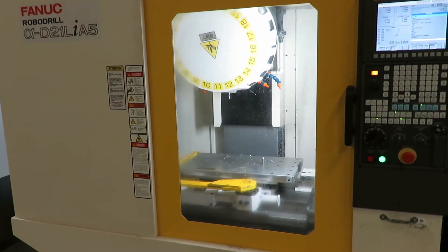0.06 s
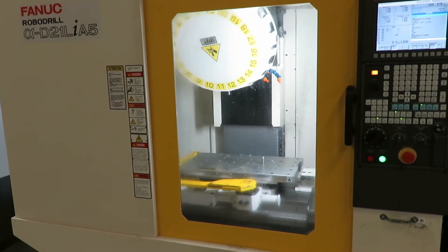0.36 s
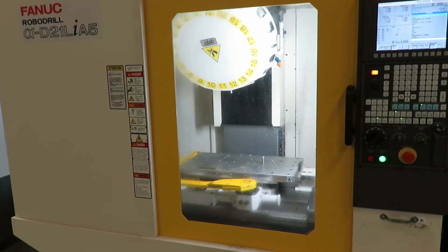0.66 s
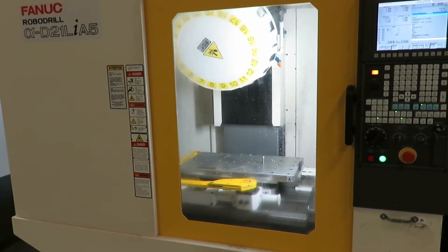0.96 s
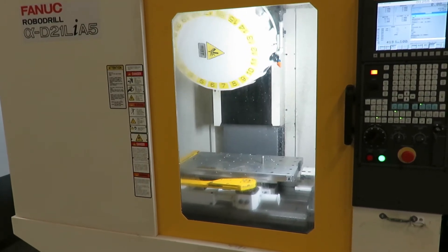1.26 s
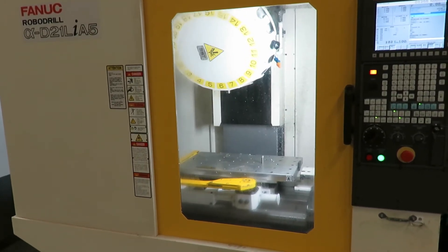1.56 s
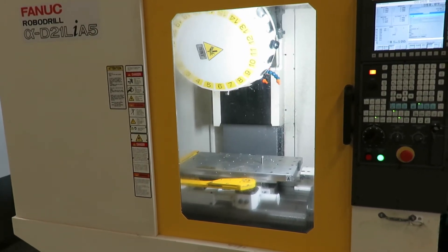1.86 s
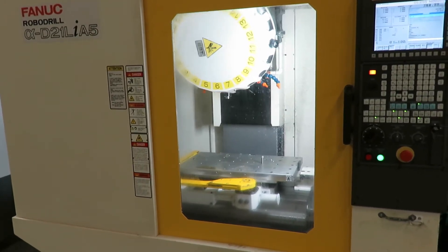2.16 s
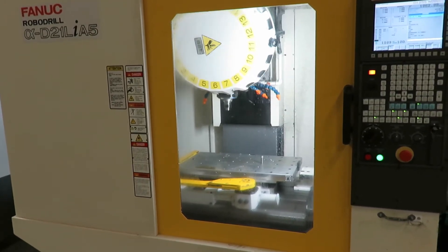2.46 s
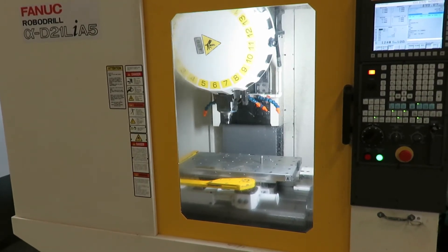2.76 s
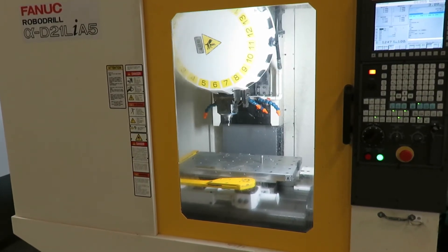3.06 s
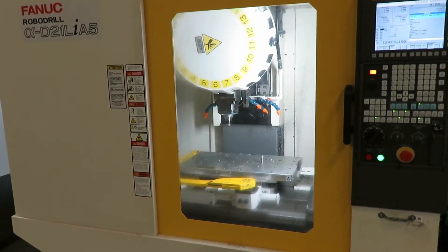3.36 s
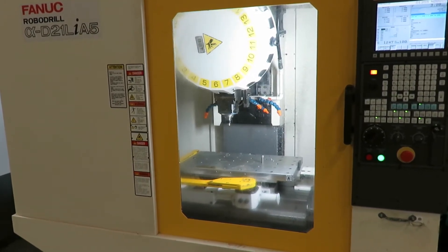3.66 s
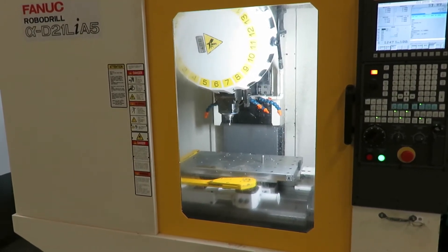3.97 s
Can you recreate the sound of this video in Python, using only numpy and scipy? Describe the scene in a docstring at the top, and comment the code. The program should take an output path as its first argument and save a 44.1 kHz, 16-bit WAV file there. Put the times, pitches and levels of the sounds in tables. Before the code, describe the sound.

A machining center changing tools, with two hissing air blasts, clunks and a whirring turret.

```python
"""A machining centre changing tools, heard from in front of its closed door on a closely spaced microphone pair.
Air blasts through the spindle taper as the tool is released with a clunk, and the geared turret whirs
round. A second blast blows while the next tool is taken up, then the spindle head travels down.
Fans and a small air leak run throughout; the recorder's gain control ducks them and lets them swell back."""
import sys
import numpy as np
from scipy import signal
from scipy.fft import rfft, irfft
from scipy.io import wavfile
from scipy.ndimage import uniform_filter1d

SR = 44100
rng = np.random.default_rng(int(sys.argv[2]) if len(sys.argv) > 2 else 0)


def transcribe(u):
    """Save the signal u as a 16-bit wav file named by the first command-line argument.

    u: samples, shape (n,) or (channels, n), limited to [-1, 1]; the rate is SR.
    q: integer samples, one column per channel.
    """
    v = np.clip(np.atleast_2d(u).T, -1, 1)
    q = np.round(v * 32767).astype(np.int16)
    wavfile.write(sys.argv[1], SR, q)


N = 176400
TIME = np.arange(N) / SR
FREQS = np.maximum(np.arange(N // 2 + 1) * SR / N, 1)

# two air blasts, a table each: time_s, hoot_db, rush_db, hiss_db, hoot_pitch_hz, taper_opening (0-1)
AIR_BLASTS = [
    [(0, -14.5, -16.5, -5.5, 1265, 0.05), (.1, -21.5, -11, -2, 1265, .05), (.33, -20.5, -15, -6.5, 1265, 0),
     (.41, -18, -16.5, -9, 1265, 0.01), (.48, -16.5, -14, -5, 1255, .05), (.58, -12.5, -13, -11, 1270, 0.2),
     (.69, -17.5, -17.5, -13, 1328, .45), (.8, -30.5, -23.5, -31.5, 1290, .5),
     (1.0, -50, -37.5, -50, 1300, 0.4), (1.2, -69, -44, -75, 1300, .5)],
    [(1.662, -50, -60, -68, 1260, .3), (1.664, -19.5, -34.5, -54, 1260, 0.32),
     (1.692, -9.5, -19.5, -23, 1270, .3), (1.71, -12, -19.5, -18, 1270, 0.37),
     (1.735, -6.5, -9.5, -4.5, 1290, .6), (1.81, -12.5, -14.5, -4, 1210, 0.8),
     (1.89, -22.5, -21.5, -10, 1110, .95), (2.06, -20.5, -25, -7, 1080, 0.99),
     (2.17, -26.5, -27, -12.5, 1050, .92), (2.28, -34, -32, -25, 1030, .7), (2.7, -59, -59, -67, 1000, .3)],
]
# upper resonances of the taper: shut_hz, open_hz, width_hz, shut_level_db, open_level_db
TAPER_RESONANCES = [(2761, 3040, 450, -2, -0.26), (4545, 4940, 570, -5, 1.7), (6250, 6860, 620, -8.5, .5),
                    (8400, 8850, 700, -12, -.5)]
# colours of the jet's rush and of its treble hiss: frequency_hz, relative_density_db
RUSH_SPECTRUM = [(30, -50), (100, -11), (500, -21), (850, -14.5), (1150, -8), (1550, -2), (1900, -2),
                 (2300, -1), (3500, 0), (5200, -5.5), (9000, -10.5), (16000, -35)]
HISS_SPECTRUM = [(1500, -32), (3500, -10.5), (5500, -7), (7500, -5.5), (9500, -3), (10800, -2.5),
                 (12600, 2), (13800, -3.5), (14600, -2), (16000, -32.5)]
# colours of the fans and pumps and of the air leak: frequency_hz, relative_density_db
FAN_SPECTRUM = [(25, -43), (55, -6), (85, -13), (140, 1.5), (205, -9), (260, -4), (390, 0.5), (470, -8.5),
                (600, -2.5), (1100, -7), (1450, -7), (1880, -1), (2150, -12.5), (2500, -13.5),
                (3500, -13.5), (8000, -33)]
LEAK_SPECTRUM = [(2500, -31), (4000, -8), (4450, -6), (4650, 2.5), (4950, 0.5), (5300, -1), (5800, -5.5),
                 (7400, -13.5), (8100, -9.5), (8600, -2.5), (9300, -7), (10300, -4), (11700, -4.5),
                 (12500, 0.5), (13300, 3), (14200, -6), (16000, -17)]
# motor hum of the fans and pumps: pitch_hz, level_db
HUM_TONES = [(89.5, -57), (119.5, -54), (178.5, -56), (268, -53), (807, -57)]
# clunks of the mechanism: start_s, panel_db, panel_t60_s, frame_boom_db
CLUNK_HITS = [(0.376, -15.5, 0.39, -21), (.422, -25.5, 0.86, -47), (1.425, -28.5, 0.44, -69),
              (1.667, -26, 0.55, -53), (1.87, -19, 0.48, -39), (1.913, -33, 0.42, -36)]
# colour of the shaken panels: frequency_hz, relative_density_db
PANEL_SPECTRUM = [(30, -32), (55, -14), (90, -6), (160, -3.5), (250, 1.5), (420, 0.5), (800, 1.5),
                  (1300, -0.5), (3000, -37), (10000, -45)]
# turret drive: time_s, shaft_hz, rattle_db, gear_tones_db, main_note_db
TURRET_RUN = [(.7, 69.5, -24, -38, -47), (.76, 74.1, -17, -26, -35), (.79, 76.4, -14.5, -39, -26),
              (.82, 80.4, -17.5, -33, -31), (.855, 82.56, -17.5, -18.5, -31.5),
              (.96, 83.1, -19, -18.5, -25.5), (1.15, 83.2, -18.5, -22.5, -25),
              (1.33, 83.4, -18, -23.5, -24.5), (1.43, 83.34, -17, -23.5, -26),
              (1.485, 80.85, -20.5, -33.5, -40), (1.62, 78.7, -29.5, -54, -52),
              (1.72, 76.4, -41, -60, -67.5)]
# gear tones: cycles_per_turn, relative_level_db, flutter_share (0-1)
GEAR_TONES = [(10, -6.5, 0.5), (12, -27, 0.8), (13, -14, 0.74), (14, -15, 0.96), (15, -7.5, 0.85),
              (17, -25, 0.9), (18, -14.5, 0.4), (20, -9.5, 0.92), (25, -20, 0.8), (26, -13.5, 1),
              (27, -10.5, 0.99), (28, -35, 1), (35, -28, 0.6), (40, -22, 0.94)]
# colour of the gear rattle: frequency_hz, relative_density_db
RATTLE_SPECTRUM = [(30, -45), (100, -45.5), (260, -6), (520, -8.5), (760, -0.5), (960, -5.5), (1180, 1.5),
                   (1800, -1), (2280, -2), (2550, -14), (3400, -16.5), (4500, -44), (12000, -46)]
# resonances of the gear housing: pitch_hz, width_hz, relative_level_db
HOUSING_RESONANCES = [(381, 30, -26), (808, 35, -21.5), (2238, 89, -14), (3170, 130, -50)]
# the spindle head on its way down: time_s, level_db
HEAD_LEVELS = [(2.05, -52), (2.3, -39), (2.5, -36), (2.7, -39.5), (3.0, -43.5)]
# colour of its low rush: frequency_hz, relative_density_db
HEAD_SPECTRUM = [(40, -10), (130, -2), (270, 5), (500, 1.5), (1200, 1.5), (3000, -7), (6000, -3),
                 (14000, -25)]
# stereo width at the microphones: frequency_hz, side_over_mid_db
MIC_WIDTH = [(30, 4), (70, -26), (160, -18.5), (300, -24), (650, -18), (1300, -29.5), (2200, -22),
             (3600, -6), (4800, -3), (9000, -7), (13500, -9), (14500, -21.5)]
# treble mismatch of the microphones: frequency_hz, left_lag_rad, left_over_right_db
MIC_MISMATCH = [(2370, 0.13, 1), (3650, 0.33, 0.5), (4840, 0.82, 1.5), (7400, 1.7, .5), (8700, 1.66, 1),
                (10300, 2.13, -0.5), (13700, 2.42, 1.9), (14500, 3.94, -7.5)]


def from_db(db):
    """Decibels to gain."""
    return 10 ** (np.asarray(db) / 20)


def unit_rms(x):
    """Scale to unit power."""
    return x / np.sqrt(np.mean(np.abs(x) ** 2) + 1e-20)


def in_time(rows):
    """Each column of a table as a curve in time."""
    time_s, *columns = np.transpose(rows)
    return [np.interp(TIME, time_s, column) for column in columns]


def in_frequency(rows):
    """Each column of a table as a curve over log frequency."""
    hz, *columns = np.transpose(rows)
    return [np.interp(np.log(FREQS), np.log(hz), column) for column in columns]


def noise(spectrum):
    """Two unrelated noises of one colour; rms 1."""
    density_db, = in_frequency(spectrum)
    white = rng.standard_normal((2, N))
    return unit_rms(irfft(rfft(white) * from_db(density_db), N))


def flutter(width_hz):
    """Two randomly wandering complex amplitudes; rms 1."""
    pole, run_in = np.exp(-np.pi * width_hz / SR), SR // 2
    real, imaginary = rng.standard_normal((2, 2, N + run_in))
    wander = signal.lfilter([1], [1, -2 * pole, pole * pole], real + 1j * imaginary)
    return unit_rms(wander[:, run_in:])


def tone(hz, amplitude):
    """A complex amplitude carried on a steady or moving frequency."""
    cycles = np.cumsum(hz * np.ones(N)) / SR
    return np.sqrt(2) * np.real(amplitude * np.exp(2j * np.pi * cycles))


def cabin(sound, t60_s=0.16, tail_db=-1.5, above_hz=1200, even_band_hz=205):
    """Short reflections between sheet-metal walls ripple the treble but keep its broad colour."""
    age = TIME[:SR // 4]
    tail = rng.standard_normal(len(age)) * from_db(-60 * age / t60_s)
    tail *= from_db(tail_db) / np.sqrt(np.sum(tail ** 2))
    treble_share = 1 / (1 + (above_hz / FREQS) ** 4)
    response = 1 + treble_share * rfft(tail, N)
    broad_power = uniform_filter1d(np.abs(response) ** 2, size=int(even_band_hz * N / SR))
    return irfft(rfft(sound) * response / np.sqrt(broad_power), N)


def air_blasts(core_damping_db=7, skirt_db=-4):
    """The jet hisses and blows the hollow taper, whose upper resonances rise as the tool leaves it."""
    hoot_db, rush_db, hiss_db, hoot_hz, opening = in_time(AIR_BLASTS[0] + AIR_BLASTS[1])
    # the hoot is the lowest resonance: a narrow core, weaker as the taper opens, on a broad skirt
    core, skirt = from_db(-core_damping_db * opening ** 2), from_db(skirt_db)
    hoot_amplitude = core * flutter(width_hz=107) + skirt * flutter(width_hz=460)
    hoot = tone(hoot_hz, hoot_amplitude / np.hypot(core, skirt))
    rush = from_db(0.5) * noise(RUSH_SPECTRUM)
    for shut_hz, open_hz, width_hz, shut_db, open_db in TAPER_RESONANCES:
        level_db = shut_db + (open_db - shut_db) * opening ** 4
        pitch_hz = shut_hz + (open_hz - shut_hz) * opening
        rush += from_db(level_db) * tone(pitch_hz, flutter(width_hz))
    rush, hiss = cabin(np.array([rush, noise(HISS_SPECTRUM)]))
    sputter = from_db(1.26 * flutter(width_hz=43)[0].real)  # the jet is unsteady
    return from_db(hoot_db) * hoot + sputter * (from_db(rush_db) * rush + from_db(hiss_db) * hiss)


def fans(waver=0.64):
    """Fans and pumps lay a steady bed of noise under their wavering motor hum."""
    hum = sum(from_db(db) * tone(hz, 1 + waver * flutter(width_hz=5.9)) for hz, db in HUM_TONES)
    return from_db(-39.5) * noise(FAN_SPECTRUM) + hum


def air_leak(level_db=-33, swell_db=1.5, swell_at_s=3.76, swell_width_s=0.053):
    """Leaking air hisses thinly inside the cabin and once, briefly, blows harder."""
    swell = np.exp(-((TIME - swell_at_s) / swell_width_s) ** 2)
    return from_db(level_db + swell_db * swell) * cabin(noise(LEAK_SPECTRUM))


def clunks(attack_s=0.0091, boom_hz=87.7, boom_t60_s=0.27):
    """Each clunk shakes the panels' dense modes and one low boom of the frame."""
    panel_noise, sound = noise(PANEL_SPECTRUM), 0
    for start_s, panel_db, panel_t60_s, boom_db in CLUNK_HITS:
        age = np.maximum(TIME - start_s, 0)
        attack = np.minimum(age / attack_s, 1)
        panels = from_db(panel_db - 60 * age / panel_t60_s) * panel_noise
        boom = from_db(boom_db - 60 * age / boom_t60_s) * np.sin(2 * np.pi * boom_hz * age)
        sound += attack * (panels + boom)
    return sound


def turret(main_teeth=5, flutter_hz=27.8, pulse_depth=0.14):
    """Gear tones follow the shaft; a rattle pulses three times a turn and rings the housing."""
    shaft_hz, rattle_db, gears_db, main_db = in_time(TURRET_RUN)
    shaft_hz *= 1 + 0.00395 * flutter(width_hz=29.7)[0].real  # backlash makes the speed shiver
    rattle = from_db(-6) * noise(RATTLE_SPECTRUM)
    for pitch_hz, width_hz, level_db in HOUSING_RESONANCES:
        rattle += from_db(level_db) * tone(pitch_hz, flutter(width_hz))
    rattle *= 1 + pulse_depth * tone(3 * shaft_hz, np.sqrt(.5))
    main_note = tone(main_teeth * shaft_hz, 1 + 0.25 * flutter(flutter_hz))
    gears = 0
    for cycles_per_turn, level_db, share in GEAR_TONES:
        amplitude = np.sqrt(1 - share ** 2) + share * flutter(flutter_hz)
        gears += from_db(level_db) * tone(cycles_per_turn * shaft_hz, amplitude)
    return from_db(rattle_db) * rattle + from_db(gears_db) * gears + from_db(main_db) * main_note


def head_travel(whine_hz=2420, whine_db=-15.5):
    """The feed drive lowers the spindle head with a low rush and a faint whine."""
    level_db, = in_time(HEAD_LEVELS)
    whine = from_db(whine_db) * tone(whine_hz, flutter(width_hz=32))
    return from_db(level_db) * (noise(HEAD_SPECTRUM) + whine)


def microphones(mid_and_side):
    """Two closely spaced microphones hear much the same bass; the treble differs in detail and phase."""
    side_gain = from_db(in_frequency(MIC_WIDTH)[0])
    in_treble = FREQS > MIC_MISMATCH[0][0]
    lag_rad, pan_db = np.array(in_frequency(MIC_MISMATCH)) * in_treble
    sign = np.array([[1], [-1]])  # left, right
    mid, side = rfft(mid_and_side)
    pair = (mid + sign * side_gain * side) / np.sqrt(1 + side_gain ** 2)
    return irfft(pair * from_db(sign * pan_db / 2) * np.exp(-1j * sign * lag_rad / 2), N)


def scene():
    """The whole machine, with the microphones in front of its door."""
    return microphones(air_blasts() + fans() + air_leak() + clunks() + turret() + head_travel())


def record(dry):
    """The recorder's gain control ducks quickly and recovers slowly; a low-pass cuts the very top."""
    threshold_db, slope, attack_s, release_db_per_s = -23, 0.59, 0.0077, 11
    power = uniform_filter1d(np.mean(dry ** 2, axis=0), size=800)
    level_db = 10 * np.log10(power + 1e-12)
    wanted_cut_db = slope * np.maximum(level_db - threshold_db, 0)
    release_db = release_db_per_s * TIME
    held_db = np.maximum.accumulate(wanted_cut_db + release_db) - release_db
    pole = np.exp(-1 / (attack_s * SR))
    cut_db, _ = signal.lfilter([1 - pole], [1, -pole], held_db, zi=[pole * held_db[0]])
    low_pass = signal.ellip(10, .3, 70, 15500, fs=SR, output="sos")
    return signal.sosfilt(low_pass, dry * from_db(-cut_db))


dry = scene()
out = record(dry)
transcribe(out)
```